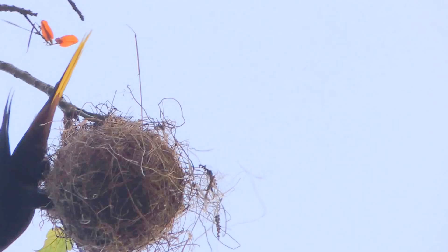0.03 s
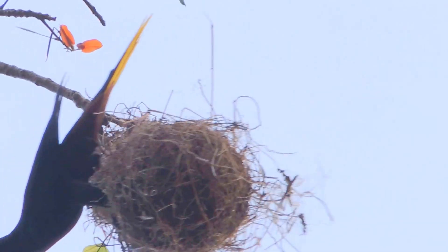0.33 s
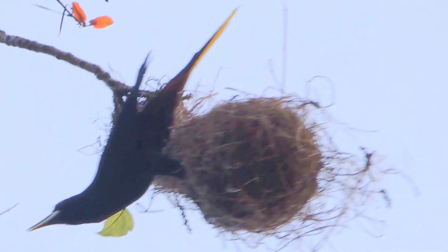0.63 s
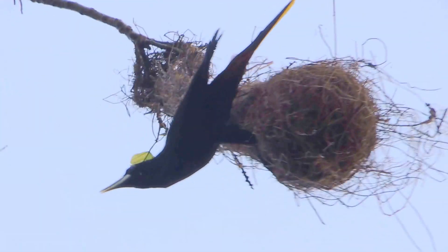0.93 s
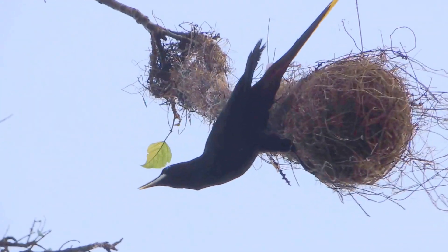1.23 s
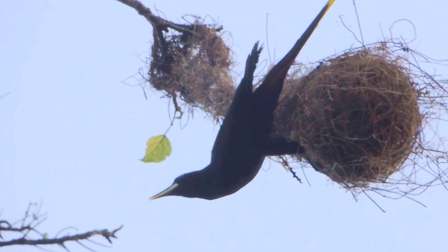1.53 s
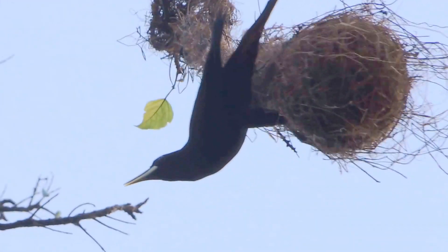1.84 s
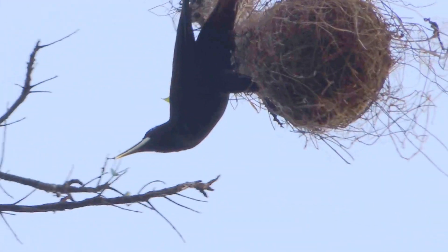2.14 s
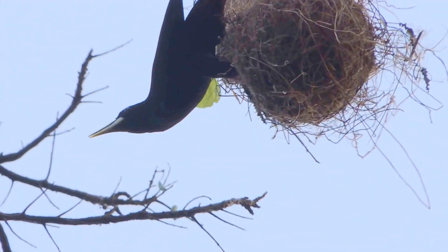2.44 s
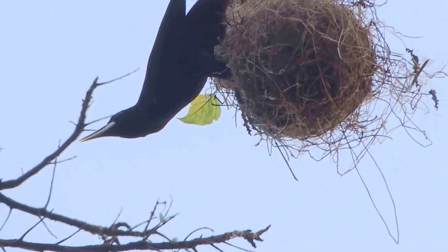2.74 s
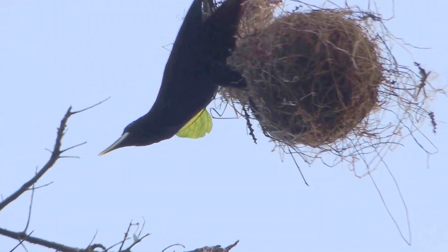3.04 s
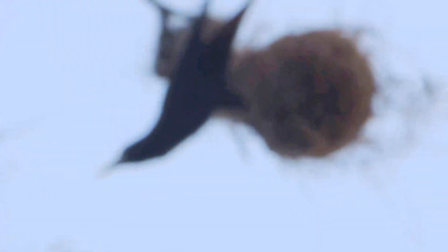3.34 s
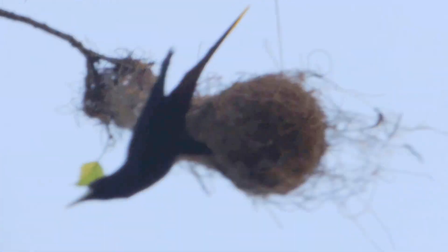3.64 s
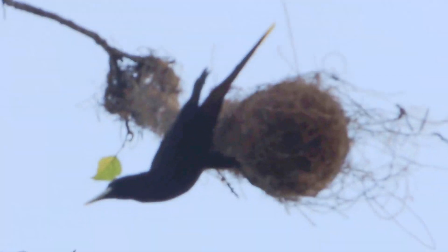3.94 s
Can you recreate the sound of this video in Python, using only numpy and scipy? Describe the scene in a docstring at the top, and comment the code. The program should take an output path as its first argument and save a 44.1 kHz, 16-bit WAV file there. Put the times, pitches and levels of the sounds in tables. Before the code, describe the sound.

A dense insect chorus rings over faint bird whistles and a distant engine speeding up.

```python
"""Insects in a tropical clearing

A dense insect chorus rings near 5 kHz. High above it two insects, probably katydids, rasp by
scraping their wings. Distant birds give thin sliding whistles, and far off a motor vehicle gathers
speed and draws nearer over the hiss of the forest. A close pair of microphones hears it all."""
import sys
import numpy as np
from scipy import signal
from scipy.fft import rfft, irfft
from scipy.io import wavfile

SR = 44100
rng = np.random.default_rng(int(sys.argv[2]) if len(sys.argv) > 2 else 0)


def generate_wav(sig):
    """Save sig (samples, or channels by samples) to the path in sys.argv[1] as 16-bit PCM at SR."""
    pcm = np.round(np.clip(np.atleast_2d(sig).T, -1, 1) * 32767).astype(np.int16)
    wavfile.write(sys.argv[1], SR, pcm)


N = 176400
T = np.arange(N) / SR
HZ = np.maximum(np.fft.rfftfreq(N, 1 / SR), 1)


def from_db(db):
    """Turn decibels into a number to multiply by."""
    return 10 ** (np.asarray(db) / 20)


def rms_one(x):
    """Scale a signal so that its average strength (rms) is 1."""
    return x / np.sqrt(np.mean(x ** 2) + 1e-20)


def in_time(rows):
    """Join rows that start with a time into smooth lines, one for each remaining column."""
    seconds, *columns = np.transpose(rows)
    return [np.interp(T, seconds, column) for column in columns]


def colour(points):
    """A gain for every frequency, drawn through (Hz, dB) points."""
    hz, db = np.transpose(points)
    return from_db(np.interp(np.log(HZ), np.log(hz), db))


def resonance(hz, width):
    """A gain for every frequency that lets through a narrow band around one pitch."""
    return 1 / (1 + (2 * (HZ - hz) / width) ** 2)


def pan(db):
    """Left and right gains that make the left side louder by db."""
    return from_db(np.array([[db], [-db]]) / 2)


def drift(rate):
    """A smooth random wobble of size about 1, changing about rate times a second."""
    coarse = T[::14]
    hz = np.fft.rfftfreq(len(coarse), coarse[1])
    spectrum = rfft(rng.standard_normal(len(coarse))) / (1 + (hz / rate) ** 2) * (hz > 1)
    return np.interp(T, coarse, rms_one(irfft(spectrum, len(coarse))))


def noise(gain, likeness):
    """Stereo noise shaped by gain; likeness 0 makes the two sides unrelated, 1 the same."""
    mid, side = irfft(rfft(rng.standard_normal((2, N))) * gain, N)
    return rms_one(np.sqrt(1 + likeness) * mid + np.sqrt(1 - likeness) * side * [[1], [-1]])


# The voices of the chorus. Each row: pitch in Hz, width in Hz, relative level in dB, lean left in dB.
CHORUS_VOICES = [(4031, 158, -55.5, 1.3), (4138, 34, -58.7, 5.1), (4245, 95, -57.5, 0.7),
                 (4360, 45, -47.7, 3.1), (4397, 70, -48.3, 1.4), (4445, 51, -44.5, 1.8),
                 (4550, 163, -40.7, 2.7), (4645, 27, -48.6, 3.6), (4712, 30, -40.3, 5.3),
                 (4740, 50, -36, 3.9), (4794, 42, -35.3, 1.1), (4827, 28, -39.2, 3.7),
                 (4851, 34, -38.2, 5.6), (4922, 46, -36.6, 2.2), (5011, 62, -48, 3.1), (5100, 60, -44, 2.3),
                 (5197, 95, -42.3, 0.2), (5312, 60, -49, 5.0), (5493, 150, -53, 3.1), (5605, 95, -53, 2.4),
                 (5720, 130, -56, -0.8), (5960, 573, -50.1, 0.1)]
# How the whole chorus swells and dips. Each row: time in seconds, change of level in dB.
CHORUS_SWELL = [(.1, -0.5), (1, -0.2), (2, 0.9), (2.6, 1.5), (3.02, 2), (3.12, -1), (4, -0.4)]


def chorus(throb_db=.6, throbs_per_s=8):
    """Each insect voice rings in its own narrow band and throbs by itself, blurred by the trees."""
    voices = np.zeros((2, N))
    for hz, width, db, pan_db in CHORUS_VOICES:
        level = from_db(db - .5 + throb_db * drift(throbs_per_s))
        voices += level * pan(pan_db) * noise(resonance(hz, width), likeness=.25)
    # A fine sizzle sits just above the voices.
    sizzle_band = colour([(4800, -26), (5400, -6), (6150, 27), (6400, -8), (7500, -11), (9000, -27)])
    sizzle = from_db(-52.5) * noise(sizzle_band, likeness=0)
    swell_db, = in_time(CHORUS_SWELL)
    return ((voices + trills()) * pan(db=.5) + sizzle) * from_db(swell_db)


# Single insects in the chorus. Each row: pitch in Hz, relative level in dB, lean left in dB.
HELD_NOTES = [(4138, -63, 5), (4532, -48, -2), (4730, -42, 4), (4832, -40, 4), (4910, -39, 2.5),
              (4926, -44, 2), (4957, -48, 3), (5202, -50, 1), (5303, -52, 3), (5321, -52, 5),
              (5499, -62, 4), (5699, -61, -2)]


def trills(wander_hz=2, fade_db=1.5):
    """Nearer insects each hold a slightly wandering note, which fades differently at each microphone."""
    notes = np.zeros((2, N))
    for hz, db, pan_db in HELD_NOTES:
        phase = 2 * np.pi * np.cumsum(hz + wander_hz * drift(6)) / SR
        sides = [from_db(fade_db * drift(2.7)) * np.sin(phase + drift(3)) for _ in range(2)]
        notes += from_db(db + .9) * np.sqrt(2) * pan(pan_db) * sides
    return notes


def stroke(cycles, width):
    """A wing stroke swells and fades at every whole cycle; its width is in cycles too."""
    return np.exp(-.5 * (((cycles + .5) % 1 - .5) / width) ** 2)


# The pace of the near katydid's wings. Each row: time in seconds, wing cycles done so far.
WING_CYCLES = [(.096, 0), (.606, 5), (.72, 6), (1.42, 13), (2.205, 21), (3.045, 30), (3.443, 34)]
# How loud it is. Each row: time in seconds, relative level in dB.
NEAR_LEVEL = [(.1, -42), (3.04, -41.5), (3.14, -45.5), (3.45, -45.5), (3.6, -67)]
# The tone of its rasp. Each row: frequency in Hz, relative strength in dB.
NEAR_RASP = [(7000, -40), (9000, -10), (10000, -6), (10600, 2.5), (11200, 1.5), (12400, 4.5), (13150, 5.5),
             (13600, 3.5), (14200, -3)]


def near_katydid(teeth_per_s=420):
    """A row of tiny teeth on the wing scrapes in long-short pairs of strokes until the insect stops."""
    cycles, = in_time(WING_CYCLES)
    strokes = stroke(cycles - .032, width=.165) + from_db(-4) * stroke(cycles - .5, width=.095)
    uneven = strokes * from_db(drift(12))
    blurred = np.hypot(uneven, from_db(-5.5))  # the leaves fill the gaps between strokes
    level_db, = in_time(NEAR_LEVEL)
    grit_db = .5 * drift(teeth_per_s)
    return blurred * from_db(level_db + grit_db) * noise(colour(NEAR_RASP), likeness=.13) * pan(db=5)


# The tone of the far katydid's rasp. Each row: frequency in Hz, relative strength in dB.
FAR_RASP = [(9000, -29), (11000, -8), (12500, -3), (14200, 3)]


def far_katydid(strokes_per_s=13.8):
    """A second insect, farther off, scrapes its wings in even strokes."""
    strokes = stroke((T - 3.755) * strokes_per_s, width=.22)
    return strokes * from_db(-45.5) * noise(colour(FAR_RASP), likeness=.1) * pan(db=5)


def whistle(notes, ease=1.3, quavers_per_s=150):
    """A bird's quavering notes slide fast at first, then ease onto their last pitch."""
    song = np.zeros(N + SR)
    quaver = np.resize(1 + .005 * drift(quavers_per_s), N + SR)
    for start, length, from_hz, to_hz, db in notes:
        progress = np.linspace(0, 1, int(length * SR))
        span = slice(int(start * SR), int(start * SR) + len(progress))
        slide = np.expm1(-ease * progress) / np.expm1(-ease)
        hz = (from_hz + (to_hz - from_hz) * slide) * quaver[span]
        fade = np.clip(np.minimum(progress, 1 - progress) / .16, 0, 1)  # soften both ends
        song[span] += from_db(db) * np.sin(np.pi / 2 * fade) * np.sin(2 * np.pi * np.cumsum(hz) / SR)
    return song[:N] * from_db(2 * drift(quavers_per_s))


def forest_echo(sound, fade_s):
    """Trunks and leaves scatter a sound into a tail that drops 60 dB in fade_s seconds."""
    decay = np.exp(-np.log(1000) * T[:SR] / fade_s)
    tail = rms_one(rng.standard_normal((2, SR)) * decay) / np.sqrt(SR)
    return signal.fftconvolve(sound[None], tail, axes=1)[:, :N]


# The birds' notes. Each row: start in seconds, length in seconds, first pitch in Hz,
# last pitch in Hz, level in dB.
BIRD_NOTES = [(.066, .075, 2330, 2150, -53), (.132, .044, 1796, 1894, -46), (.231, .035, 2020, 1826, -43),
              (.26, .036, 1830, 2000, -39), (.299, .026, 1880, 1960, -39), (.330, .027, 1946, 2010, -37.5),
              (.449, .047, 2900, 3320, -40.5), (.568, .045, 3080, 3180, -37), (.610, .045, 2950, 2600, -48),
              (.644, .07, 2230, 1850, -39), (.895, .035, 3000, 2550, -47), (.920, .058, 2260, 1980, -40),
              (1.220, .035, 3000, 2450, -52), (1.243, .052, 2330, 1990, -40), (2.0, .115, 7800, 6100, -47),
              (2.012, .055, 2850, 3230, -41), (2.133, .048, 3030, 3270, -38),
              (2.277, .053, 2970, 3280, -36.5), (2.395, .055, 3100, 3350, -43)]


def whistling_birds():
    """Thin whistles are smeared by the leaves on the way and echo through the forest."""
    song = whistle(BIRD_NOTES)
    smeared = song + from_db(-11) * forest_echo(song, fade_s=.07)
    return smeared * pan(db=-2.5) + from_db(-8) * forest_echo(song, fade_s=.5)


# How loud the chirping bird is. Each row: time in seconds, relative level in dB.
CHIRP_LEVEL = [(.1, -49), (1.5, -49), (2.5, -49), (3, -49.5), (3.4, -53)]


def chirping_bird(count=36, every_s=.1105, length_s=.042, from_hz=3090, to_hz=3280):
    """A farther bird, half lost in echo, repeats a faint rising chirp, never quite the same."""
    late, sharp, loud = rng.standard_normal((count, 3)).T
    starts = np.clip(.062 + every_s * np.arange(count) + .008 * late, 0, T[-1])
    tunings = 1 + .008 * sharp
    levels = np.interp(starts, *np.transpose(CHIRP_LEVEL)) + 1.3 * loud
    song = whistle([(start, length_s, from_hz * tuning, to_hz * tuning, db)
                    for start, tuning, db in zip(starts, tunings, levels)])
    return from_db(-.5) * (song + forest_echo(song, fade_s=.3))


# The engine speeding up. Each row: time in seconds, firings per second, then the levels in dB
# of the tones at one, two and three times that rate.
ENGINE = [(.07, 60, -49, -67, -70), (.3, 69, -50, -63, -68), (.6, 72, -51, -60, -66),
          (1, 79, -54, -57, -60), (1.5, 86, -63, -58, -58), (2, 94, -56, -56, -59),
          (2.5, 102, -52, -49, -61), (3, 111, -51, -52, -59), (3.5, 119, -55, -60, -56),
          (4, 123, -53, -60, -59)]
# Its weaker tones. Each row: multiple of the firing rate, level in dB compared with the roar.
WEAK_TONES = [(.5, -14.5), (1.5, -21), (2.5, -34), (3.5, -18), (4, -14), (4.5, -18.5), (5.5, -20), (6, -21),
              (6.5, -19.5), (7, -18.5)]
# How loud the road roar is. Each row: time in seconds, level in dB.
ROAR_LEVEL = [(.1, -52.5), (.9, -53), (1.6, -50.5), (2.3, -47), (2.9, -43), (3.1, -46.5), (4, -43.5)]
# The tone of the roar. Each row: frequency in Hz, relative strength in dB.
ROAR_TONE = [(25, -28.5), (100, -5.5), (180, 1.5), (300, 0), (420, 2), (510, -3), (730, 5), (900, -1.5),
             (1150, -8.5), (1600, -6.5), (2500, -12), (4000, -33)]


def vehicle(waver_db=2):
    """A far engine hums ever higher as it fires faster, over a dull roar that grows as it nears."""
    firing_hz, *main_levels = in_time(ENGINE)
    roar_db, = in_time(ROAR_LEVEL)
    phase = 2 * np.pi * np.cumsum(firing_hz * (1 + .0022 * drift(18))) / SR
    tones = list(enumerate(main_levels, 1)) + [(multiple, roar_db + db) for multiple, db in WEAK_TONES]
    hum = np.zeros(N)
    for multiple, db in tones:
        level = from_db(db + waver_db * drift(18))
        hum += level * np.sqrt(2) * np.sin(multiple * phase + rng.uniform(0, 2 * np.pi))
    roar = from_db(roar_db) * noise(colour(ROAR_TONE), likeness=.86)
    return (hum + roar) * pan(db=1.5)


# The tone of the forest's hiss. Each row: frequency in Hz, relative strength in dB.
HISS_TONE = [(200, -1), (1000, -1), (1400, 1), (2000, 3.5), (2600, -2), (3600, -2.5), (4200, 2.5),
             (5800, 2), (6600, 5), (8000, 1), (9500, -1.5), (10500, -13), (14000, -6)]
# How loud the hiss is. Each row: time in seconds, level in dB.
HISS_LEVEL = [(.1, -44), (3.02, -43.5), (3.15, -44.5), (4, -44.5)]


def air():
    """The air rumbles low under the even hiss of the forest."""
    rumble_band = colour([(15, 2), (40, -4), (80, -1.5), (150, -5.5), (400, -15), (1000, -54)])
    rumble = from_db(-54) * noise(rumble_band, likeness=1) * pan(db=3.5)
    hiss_db, = in_time(HISS_LEVEL)
    hiss = from_db(hiss_db) * noise(colour(HISS_TONE), likeness=.1) * pan(db=.7)
    return rumble + hiss


def scene(left_lag_s=.0001188):
    """Everything together, reaching the left microphone a moment after the right."""
    insects = chorus() + near_katydid() + far_katydid()
    left, right = insects + whistling_birds() + chirping_bird() + vehicle() + air()
    return np.array([np.interp(T - left_lag_s, T, left), right])


def record(dry, start_s=.069, thump_decay_s=.06, cutoff_hz=14200):
    """After a short silence the sound opens with a soft thump as the input settles; the top is cut."""
    thump = from_db(-32) * np.exp(-np.maximum(T - start_s, 0) / thump_decay_s)
    fade_in = np.clip((T - start_s) / .002, 0, 1)
    steep_lowpass = signal.ellip(12, .1, 75, cutoff_hz, fs=SR, output="sos")
    return signal.sosfilt(steep_lowpass, (dry + thump) * fade_in)


dry = scene()
out = record(dry)
generate_wav(out)
```